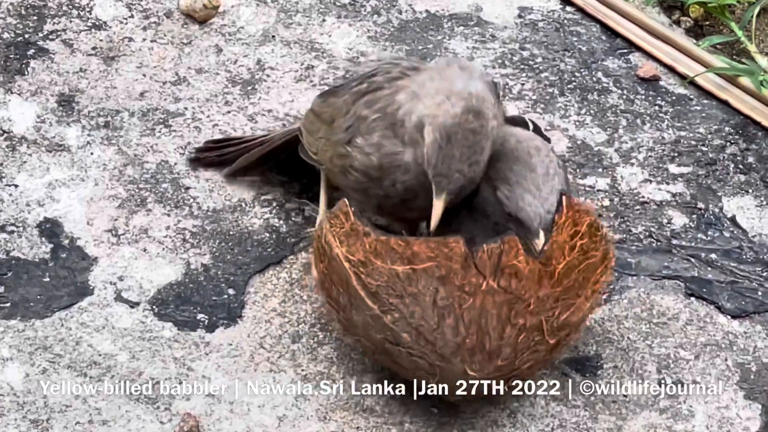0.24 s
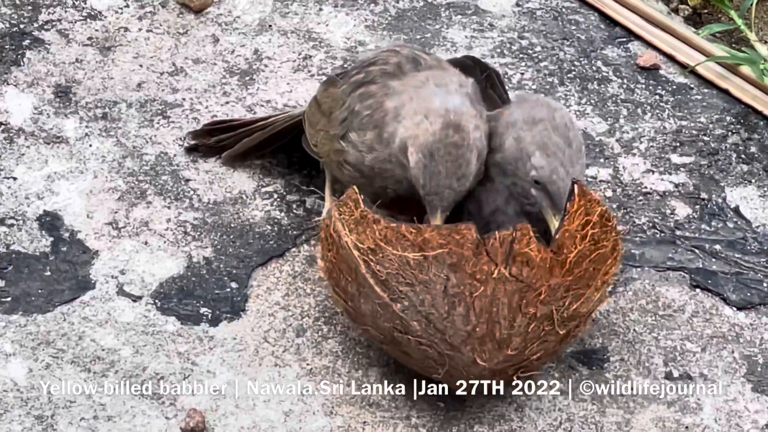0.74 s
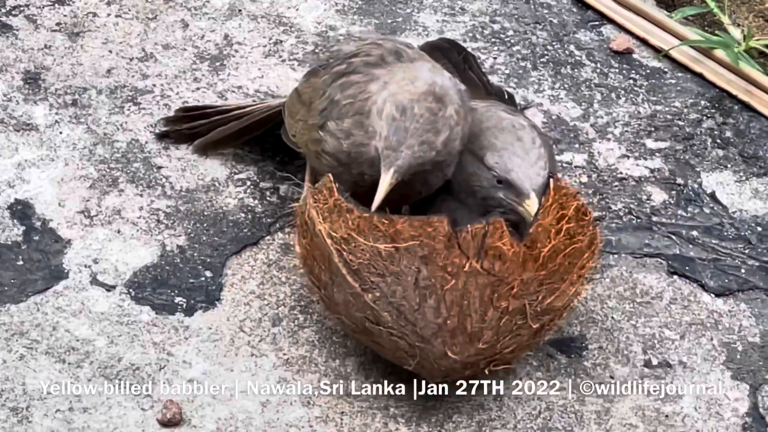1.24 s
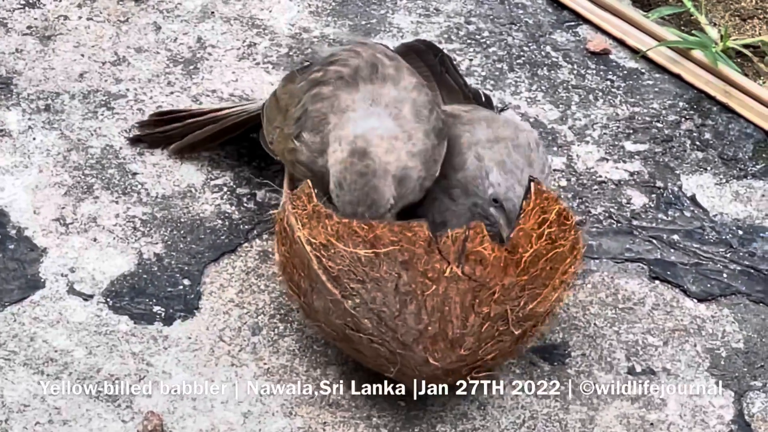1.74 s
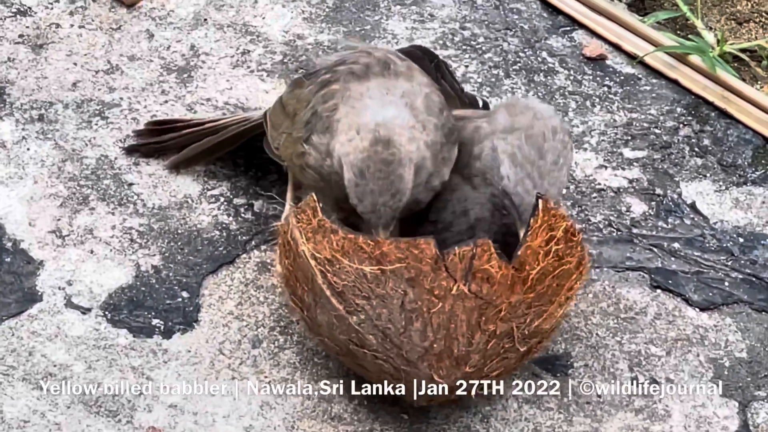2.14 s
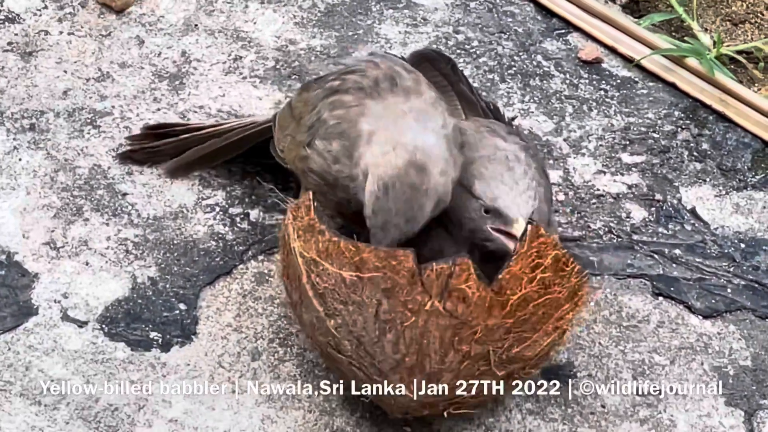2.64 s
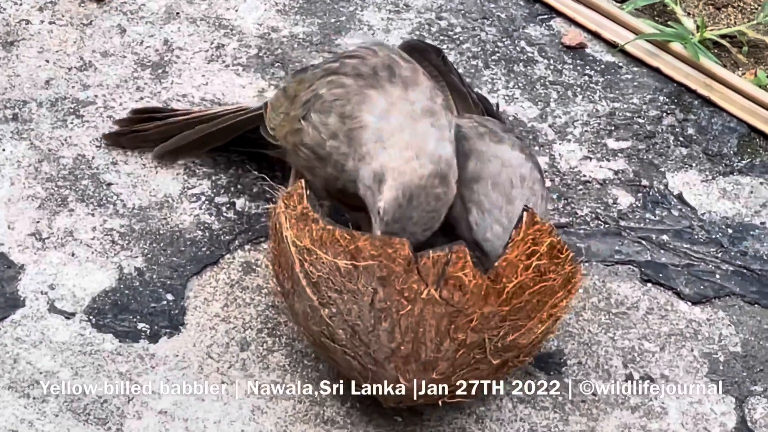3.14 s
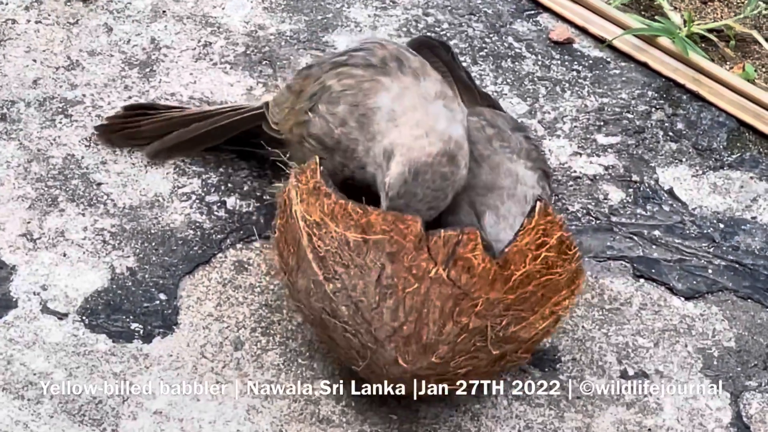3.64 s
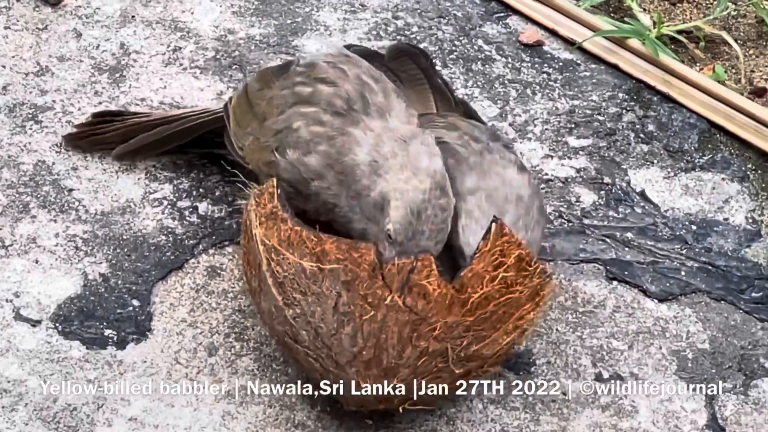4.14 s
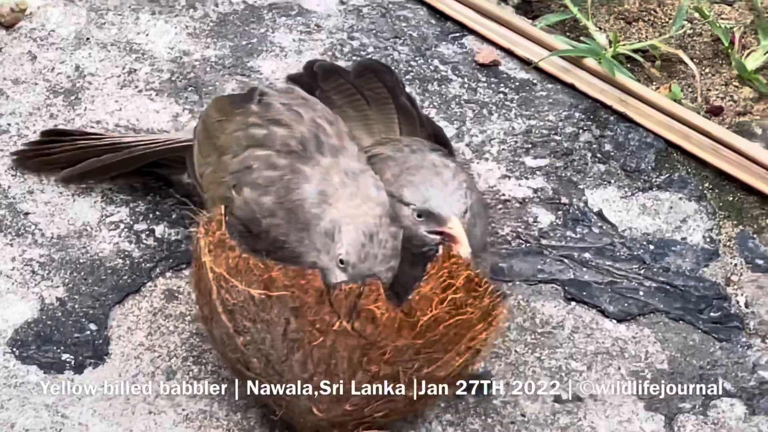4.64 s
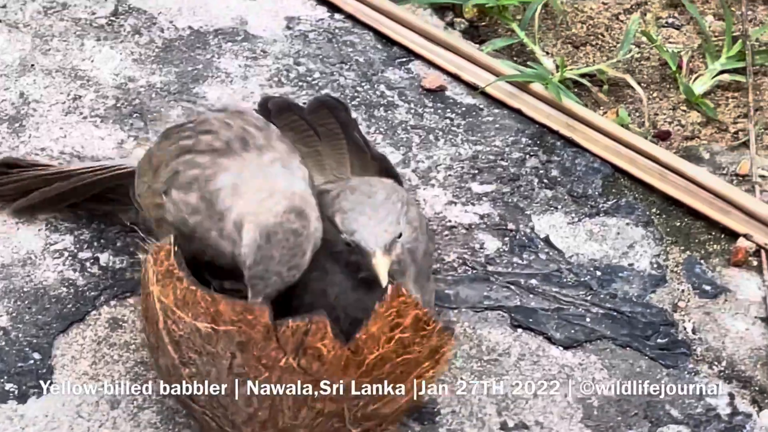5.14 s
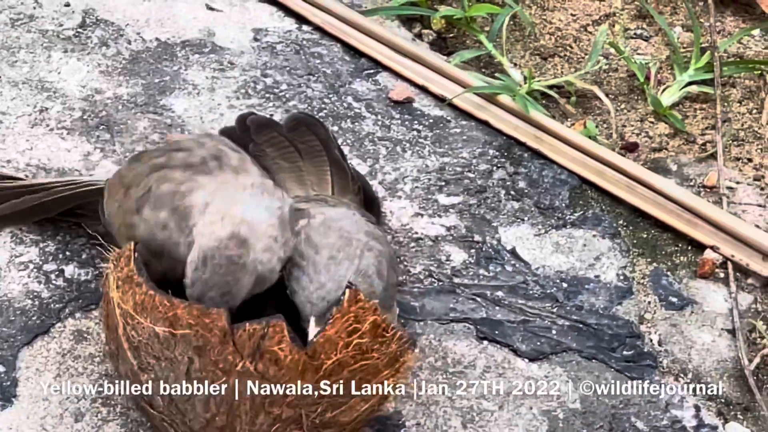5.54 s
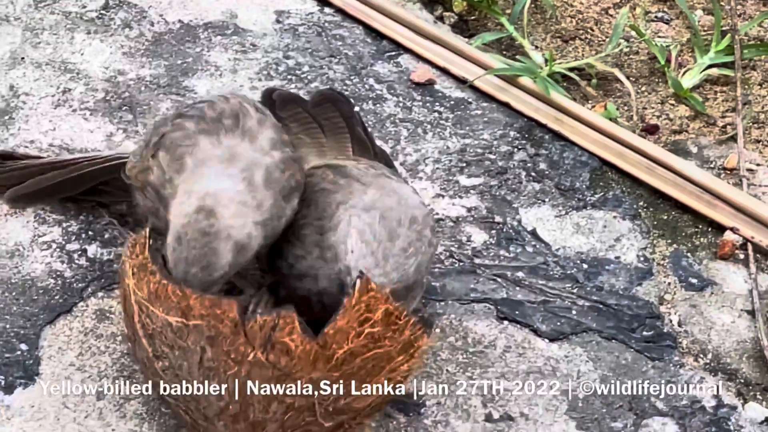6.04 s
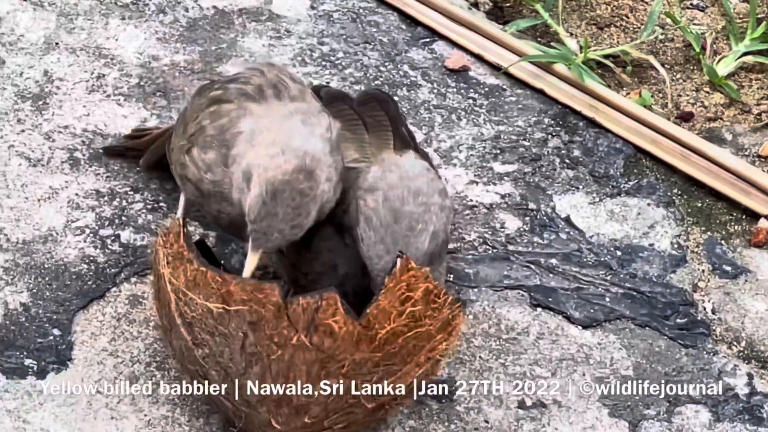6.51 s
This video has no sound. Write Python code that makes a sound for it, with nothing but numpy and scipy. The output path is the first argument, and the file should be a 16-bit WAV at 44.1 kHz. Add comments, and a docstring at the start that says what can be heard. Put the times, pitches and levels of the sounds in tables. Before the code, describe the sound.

Small birds squeak sharply close by and tap a hollow coconut shell, while a crow caws hoarsely three times over a low outdoor hum.

```python
"""A garden path between walls: two babblers feed close by from a coconut shell, squeaking and tapping it.
A crow caws three times from farther off, echoing; more of the flock wheeze and rasp faintly, farther off.
The squeaks are two-voiced tones, the caws rattling harmonics, the far calls gliding tones with jittered pitch.
Taps ring the modes of the shell and ticks are short noise bursts; under it lie a town hum and insect hiss."""
import sys
import numpy as np
from scipy import signal
from scipy.fft import rfft, irfft, next_fast_len
from scipy.io import wavfile
from scipy.ndimage import uniform_filter1d

SR = 44100
rng = np.random.default_rng(int(sys.argv[2]) if len(sys.argv) > 2 else 0)


def transcribe(signal):
    """Save signal, clipped to [-1, 1], as a 16-bit WAV file at the path in sys.argv[1]."""
    frames = np.atleast_2d(signal).T
    limited = np.clip(frames, -1, 1)
    pcm = np.round(limited * 32767).astype(np.int16)
    wavfile.write(sys.argv[1], SR, pcm)


N = 298557
TIME = np.arange(N) / SR  # s

# town rumble: [f/Hz, relative level/dB]
RUMBLE = [(15, -18), (25, -7), (40, -5), (70, 1), (95, -6), (150, -7), (210, -12), (300, -16.5),
          (490, -20.5), (680, -26), (950, -25.5), (1800, -86)]
# far air and insects: [f/Hz, relative level/dB]
AIR = [(500, 3.5), (900, 0), (1300, 0.5), (2200, -2.5), (3200, -10.5), (4500, -19.5), (5700, -18),
       (6600, 5), (7400, -16.5), (9200, -3.5), (10300, -32.5), (11500, -16), (12500, -28), (13500, -51)]
# slow swell of the far air and insects: [t/s, level/dB]
AIR_SWELL = [(0, -67.5), (1.9, -64), (2.25, -67.5), (2.7, -63.5), (4.3, -67.5), (5.5, -68), (6.1, -63),
             (6.7, -69)]
# left-right likeness of the background: [f/Hz, likeness 0-1]
LIKENESS = [(30, .94), (80, .92), (160, .86), (330, .72), (700, .5), (1300, .45), (2500, .85), (5000, .96),
            (12000, .8)]
# squeaks from the upper side of the syrinx: [start t/s, length t/s, first f/Hz, middle f/Hz, last f/Hz,
# level/dB, swell over the note/dB, relative octave level/dB, relative period-doubling level/dB]
UPPER_NOTES = [(0, 0.012, 4890, 4160, 3570, -38.5, -10, -11, -17),
               (.091, 0.1, 4240, 3867, 3325, -39.5, 6, -13.5, -32),
               (.178, 0.063, 3324, 3697, 3930, -39.5, -5, -12.5, -32),
               (2.68, 0.078, 3950, 3980, 4013, -49.5, 1, -16, -21),
               (2.748, 0.066, 4010, 4225, 4373, -42.5, 6, -20.5, -9.5),
               (2.805, .085, 4186, 4273, 4060, -42, -1, -3, -21.5),
               (2.887, .063, 4920, 4450, 4080, -50.5, 10, 3, -31),
               (3.026, 0.041, 4060, 3954, 3790, -45, 3, -13, -35),
               (3.053, .057, 3710, 3827, 4197, -43, 7, -22, -35),
               (3.13, .033, 3940, 3520, 3340, -42.5, -6, -17, -20),
               (4.818, 0.13, 4120, 4098, 4190, -43, 16, -10.5, -45),
               (4.93, 0.083, 4045, 4200, 4500, -33, 3.5, -11, -52),
               (5.002, .021, 4430, 4220, 3750, -39.5, -14, -8.5, -45),
               (5.102, 0.1245, 4370, 3930, 3803, -36, 13, -13.5, -33)]
# squeaks from its lower side: [same columns and units]
LOWER_NOTES = [(.197, 0.039, 2568, 2490, 2480, -44.5, -2, -27, -28),
               (3.032, 0.062, 2415, 2380, 2550, -43.5, 0, -18, -37),
               (3.083, .053, 2484, 2577, 2593, -35, 12, -18.5, -46),
               (5.219, .05, 2710, 2585, 2600, -31.5, -4.5, -15.5, -42)]
# tones made where both voices sound at once: [multiple of upper pitch, multiple of lower pitch]
COMBINATIONS = [(1, -1), (-1, 2), (1, 1), (1, 2), (2, 1), (1, 3)]
# their strengths against the weaker voice: [relative level/dB]
COMBINATION_DB = [-22.5, -32.5, -18.5, -5.5, -25, -26.5]
# colour of the babblers' breath and fizz: [f/Hz, relative level/dB]
FIZZ_COLOUR = [(900, -29.0), (2200, 11.5), (5000, -2), (8500, 7.5), (10300, -9.5), (11500, -10.5), (14000, -14)]
# thin far calls, whines of the flock and one low, faint tone from something distant:
# [start t/s, length t/s, first f/Hz, last f/Hz, level/dB, relative octave level/dB]
FAR_CALLS = [(0, 0.027, 4840, 4440, -52.5, -3.5), (0.26, 0.37, 964, 927, -69, -13),
             (.457, 0.067, 4830, 4620, -70.5, -19), (1.06, .33, 3070, 2950, -67.5, -19),
             (1.156, 0.33, 3457, 3944, -68, -5), (1.444, .16, 3710, 3610, -61.5, -22),
             (2.449, 0.3, 3500, 3975, -64.5, -5.5), (3.504, 0.12, 3393, 3270, -63, -25),
             (3.846, 0.06, 2540, 2522, -60, -40), (4.26, .28, 3624, 4026, -63, -8),
             (4.352, 0.05, 2050, 2035, -60, -10), (4.544, 0.11, 3825, 3465, -58.5, -12),
             (4.662, .073, 2124, 2060, -65, -9), (4.668, 0.12, 3554, 3360, -59, -17),
             (5.96, 0.24, 4190, 3575, -65.5, -4)]
# rasps of the flock: [start t/s, length t/s, first f/Hz, last f/Hz, level/dB, pitch jitter as a share]
RASPS = [(0.119, 0.048, 2590, 2415, -58, 0.15), (0.314, 0.044, 2673, 2714, -59, 0.12),
         (0.465, 0.042, 2470, 2340, -67, 0.093), (1.15, 0.31, 3017, 2885, -66.5, 0.053),
         (1.877, 0.048, 2750, 2660, -61.5, .13), (2.399, 0.19, 1650, 1517, -66.5, .15),
         (2.679, 0.49, 1986, 2385, -65.5, 0.13), (2.68, 0.34, 3670, 3370, -64, 0.024),
         (3.436, 0.14, 2544, 2890, -64, 0.11), (3.505, .11, 2937, 2823, -60.5, 0.125),
         (3.903, .19, 2920, 2964, -60, 0.0433), (3.915, 0.167, 2547, 2580, -68, 0.058),
         (4.259, 0.099, 2690, 2257, -59, 0.05), (4.594, 0.13, 2734, 2205, -59, 0.051)]
# three caws: [start t/s, length t/s, pitch f/Hz, rattle f/Hz, level/dB, relative level of partials above
# the third/dB, their rise as the beak opens/dB, hiss level/dB, left over right/dB]
CAWS = [(.724, 0.28, 473.5, 86.54, -35.5, -4, 11.5, -55, 3.5),
        (1.4, 0.27, 474, 97.9, -35, -12, -5, -56, 5.5), (5.606, .285, 471.5, 98.4, -38, -3, 11, -56, 2)]
# pitch arch of a caw: [share of its length, pitch ratio]
CAW_ARCH = [(0, .9), (.12, .965), (.25, .995), (.45, 1.003), (.72, .998), (.85, .99), (1, .92)]
# resonances of the crow's throat: [f/Hz, relative level/dB]
THROAT = [(500, -55), (750, -13.5), (930, -23.5), (1150, -3.5), (1310, -2.5), (1420, -1.5), (1520, -2.5),
          (1650, 1), (1880, -1), (2000, 2), (2250, -11.5), (2600, -40), (3200, -60)]
# hiss of the caws: [f/Hz, relative level/dB]
CAW_HISS = [(1800, -25), (2500, 2), (3200, -8), (3800, -0.5), (5000, -0.5), (6300, 1), (8400, -2.5),
            (9400, -9), (10300, -30), (11400, -0.5), (12100, -23), (12700, -48)]
# off the walls, the caws arrive out of step: [f/Hz, lead of the left/rad]
CAW_LEAD = [(500, .3), (1030, 1), (1460, 0.9), (1950, -1.55), (2250, -0.2), (2700, .4)]
# bill on the shell: [start t/s, level/dB, ring of the modes above 1 kHz/dB]
PECKS = [(0.939, -40.5, -13), (1.965, -51.5, -1), (2.224, -42, 9), (2.449, -42, -5), (2.494, -52.5, -9),
         (3.427, -43, 10), (4.077, -43.5, 3), (4.377, -39.5, 6.5), (5.945, -41, 10.5), (6.572, -46, 5),
         (6.73, -50, 0)]
# modes of the coconut shell: [f/Hz, relative level/dB, 60 dB decay t/s]
SHELL = [(670, 1, 0.032), (788, 7.5, 0.02), (901, 5.5, 0.021), (1094, -3, 0.023), (1310, 0, 0.011),
         (1615, -9.5, 0.03), (2420, -37, 0.022), (3280, -14.5, 0.022)]
# colour of the bill's scrape: [f/Hz, relative level/dB]
SCRAPE_COLOUR = [(400, 0.0), (800, 5), (1400, -20), (2200, -19), (6000, -31), (12000, -49)]
# bill snaps and claw ticks: [start t/s, level before the common gain of ticks()/dB]
TICKS = [(1.3271, -57), (1.9854, -56), (2.227, -49), (2.255, -45), (2.2694, -42.5), (2.553, -38.5),
         (2.5654, -43), (4.378, -52.5), (5.2412, -35.5), (6.0863, -41.5), (6.095, -46.5), (6.1806, -47),
         (6.2337, -50.5)]
# colour of a tick: [f/Hz, relative level/dB]
TICK_COLOUR = [(1200, -14.5), (3000, -1.5), (6000, -5.5), (9000, -4.5), (11500, -3), (13000, -22),
               (15500, -22)]

RUMBLE_DB, HUM_HZ, HUM_DB = -52.5, 76, -59.5
# every squeak bulges in the middle; its pitch sags (as a share) when pressure is low
NOTE_ATTACK_S, NOTE_RELEASE_S, NOTE_BULGE_DB, NOTE_SAG = .006, .012, 4, .085
# every caw swells in, grows a little and fades; its pitch wanders (as a share)
CAW_ATTACK_S, CAW_RELEASE_S, CAW_SWELL_DB, CAW_WANDER = 0.072, 0.058, 0.5, 0.0094
FAR_CALL_JITTER = 0.0162  # share of the pitch
CUTOFF_HZ = 15700


def from_db(db):
    """Decibels to gain."""
    return 10 ** (np.asarray(db) / 20)


def rms_one(x):
    """Scale to rms 1."""
    return x / np.sqrt(np.mean(x ** 2) + 1e-20)


def at_hz(points, hz):
    """Read a table on a log-frequency axis."""
    f, value = np.transpose(points)
    return np.interp(np.log(hz + 1e-3), np.log(f), value)


def bins(count):
    """Frequencies of the spectrum of count samples."""
    return np.fft.rfftfreq(count, 1 / SR)


def colour(x, spectrum):
    """Pass a sound through a smooth resonance curve; rms 1."""
    count = x.shape[-1]
    size = next_fast_len(count)
    gain = from_db(at_hz(spectrum, bins(size)))
    return rms_one(irfft(rfft(x, size) * gain, size)[..., :count])


def drift(rate, count):
    """Smooth random wander with spread about 1, from rate random points per second."""
    knots = rng.standard_normal(int(count / SR * rate) + 3)
    return np.interp(np.arange(count) / SR * rate, np.arange(len(knots)), knots) / np.sqrt(2 / 3)


def pan(db):
    """Left and right gains for a level difference."""
    gains = from_db(np.array([[db], [-db]]) / 2)
    return gains / gains.mean()


def add(out, start, sound):
    """Mix a sound in at its start time."""
    i = max(0, int(start * SR))
    out[..., i:i + sound.shape[-1]] += sound[..., :N - i]


def stereo(mid, side, alike):
    """Blend independent noises into a left-right pair of the given likeness."""
    alike = np.clip(alike, 0, 1)
    return np.sqrt(1 + alike) * mid + np.sqrt(1 - alike) * side * [[1], [-1]]


def garden(x, t60, wet_db, alike, delay=0.0022):
    """Scattered echoes from walls and leaves, decaying noise that differs between left and right."""
    t = np.arange(SR) / SR
    # silent for the delay, then full after as long again
    onset = np.clip(t / delay - 1, 0, 1)
    mid, side = rng.standard_normal((2, SR)) * from_db(-60 * t / t60) * onset
    echoes = rms_one(stereo(mid, side, alike)) / np.sqrt(SR)
    return x + from_db(wet_db) * signal.fftconvolve(np.atleast_2d(x), echoes, axes=1)[:, :N]


def delay_right(pair, phase_lag):
    """Hold the right channel back by a phase in radians at each frequency."""
    size = next_fast_len(N + 64)
    right = irfft(rfft(pair[1], size) * np.exp(-1j * phase_lag(bins(size))), size)[:N]
    return np.array([pair[0], right])


def from_the_left(pair, lag=1.0):
    """Sound from a little to the left arrives lag samples later at right; the phase shift levels off in the treble."""
    return delay_right(pair, lambda hz: np.minimum(2 * np.pi * hz * lag / SR, .8))


def out_of_step(pair, lead):
    """Scattered sound: the right's phase trails the left's by a table of (Hz, radians)."""
    return delay_right(pair, lambda hz: at_hz(lead, hz))


def pressure(t, length, attack, release):
    """Air pressure of one call, 0-1: attack, hold, release."""
    return np.clip(np.minimum(t / attack, (length - t) / release), 0, 1)


def ambience(spectrum):
    """Steady stereo noise, wide in the middle range; rms 1."""
    size = next_fast_len(N)
    mid, side = rfft(rng.standard_normal((2, size)))
    pair = stereo(mid, side, at_hz(LIKENESS, bins(size)))
    return rms_one(irfft(pair * from_db(at_hz(spectrum, bins(size))), size)[:, :N])


def background():
    """Town rumble with a wavering engine hum, and the hiss of air and insects."""
    phase = 2 * np.pi * np.cumsum(HUM_HZ * (1 + 0.0308 * drift(12, N))) / SR
    hum = np.sqrt(2) * np.sin(phase) * from_db(HUM_DB + 2 * drift(5.2, N))
    air = from_db(np.interp(TIME, *np.transpose(AIR_SWELL))) * ambience(AIR)
    return hum + from_db(RUMBLE_DB) * ambience(RUMBLE) + air


def phrase(rows):
    """Each note bends along one arc, overlapping notes are slurred; gives pitch, level, octave and half-pitch shares."""
    total = np.zeros((5, N))
    for start, length, first_hz, middle_hz, last_hz, level_db, swell_db, octave_db, half_db in rows:
        t = np.arange(int(length * SR)) / SR
        along = 2 * t / length - 1  # -1 to 1
        arc = np.polyfit([-1, 0, 1], [first_hz, middle_hz, last_hz], 2)
        hz = np.polyval(arc, along)
        level = from_db(level_db + swell_db * along / 2 - NOTE_BULGE_DB * along ** 2)
        push = pressure(t, length, NOTE_ATTACK_S, NOTE_RELEASE_S)
        values = (1, hz, level, from_db(octave_db), from_db(half_db))
        add(total, start, np.array([push * value for value in values]))
    # average overlapping notes, weighted by pressure
    hz, level, octave, half = total[1:] / (total[0] + 1e-9)
    push = np.minimum(total[0], 1)
    return hz * (1 - NOTE_SAG * (1 - push)), level * push, octave, half


def squeaks(rows, jitter, third_db, flutter_db):
    """One side of the syrinx: a near sine, overtones, a trace of period doubling; gives sound, phase, level."""
    hz, level, octave, half = phrase(rows)
    phase = 2 * np.pi * np.cumsum(hz * (1 + jitter * drift(500, N))) / SR
    overtones = np.sin(2 * phase) + from_db(third_db) * np.sin(3 * phase)
    doubling = np.sin(phase / 2) + .35 * np.sin(3 * phase / 2)
    tone = np.sin(phase) + octave * from_db(2 * drift(120, N)) * overtones
    tone += half * from_db(2 * drift(40, N)) * doubling
    level = np.sqrt(2) * level * from_db(flutter_db * drift(150, N))
    return tone * level, phase, level


def babblers(breathy_db=-40, clash_db=-13):
    """Where the two voices overlap they modulate each other into combination tones and a harsh fizz."""
    upper, upper_phase, upper_level = squeaks(UPPER_NOTES, jitter=0.0045, third_db=-25.5, flutter_db=0.74)
    lower, lower_phase, lower_level = squeaks(LOWER_NOTES, jitter=0.0068, third_db=-6.5, flutter_db=2.5)
    overlap = np.minimum(upper_level, lower_level)
    mixed = sum(from_db(db) * np.sin(m * upper_phase + n * lower_phase)
                for (m, n), db in zip(COMBINATIONS, COMBINATION_DB))
    fizz = colour(rng.standard_normal(N), FIZZ_COLOUR)
    fizz_level = from_db(breathy_db) * (upper_level + lower_level) + from_db(clash_db) * overlap
    voices = upper + lower + overlap * mixed + fizz_level * fizz
    return garden(voices, t60=0.42, wet_db=-13.0, alike=0.92)


def glide(length, first_hz, last_hz, jitter, jitter_hz, flutter_db, octave_db, third_db):
    """One gliding call; fast pitch jitter turns a thin tone into a rasp."""
    count = int(length * SR)
    pitch = np.linspace(first_hz, last_hz, count) * (1 + jitter * drift(jitter_hz, count))
    phase = 2 * np.pi * np.cumsum(pitch) / SR
    tone = np.sin(phase) + from_db(octave_db) * np.sin(2 * phase) + from_db(third_db) * np.sin(3 * phase)
    return tone * signal.windows.tukey(count, .25) * from_db(flutter_db * drift(250, count))


def far_calls():
    """Faint gliding tones wrapped in echoes: thin far calls, one of them low, and the flock's rasps."""
    out = np.zeros(N)
    for start, length, first_hz, last_hz, level_db, octave_db in FAR_CALLS:
        call = glide(length, first_hz, last_hz, FAR_CALL_JITTER, jitter_hz=700.4, flutter_db=2.0,
                     octave_db=octave_db, third_db=-47)
        add(out, start, from_db(level_db) * call)
    for start, length, first_hz, last_hz, level_db, jitter in RASPS:
        rasp = glide(length, first_hz, last_hz, jitter, jitter_hz=1321, flutter_db=4.0,
                     octave_db=-26, third_db=-17)
        add(out, start, from_db(level_db) * rasp)
    return garden(out, t60=0.63, wet_db=-0.5, alike=0.8)


def crow(rattle_swing=0.25, noise_db=-13, edge_noise_db=12, hiss_flutter_db=-0.2):
    """A harmonic voice, shaken in pitch (swing in radians) and strength by a fast rattle, rings in the throat."""
    voice, hiss = np.zeros((2, N)), np.zeros(N)
    for start, length, hz, rattle_hz, level_db, upper_db, opening_db, hiss_db, pan_db in CAWS:
        count = int(length * SR)
        along = np.linspace(0, 1, count)
        bend = np.interp(along, *np.transpose(CAW_ARCH)) * (1 + CAW_WANDER * drift(34.42, count))
        turn = 2 * np.pi * np.cumsum(rattle_hz * bend * (1 + 0.096 * drift(145.6, count))) / SR
        phase = 2 * np.pi * np.cumsum(hz * bend * (1 + .005 * drift(500, count))) / SR
        phase += rattle_swing * np.sin(turn)
        rattle = rms_one(np.exp(.32 * np.cos(turn + 1.1) + .2 * drift(250, count)))
        # the opening beak changes the balance of the partials above the third
        beak_db = upper_db + opening_db * (along - .5)
        buzz = sum(np.cos(k * phase) * from_db(beak_db * (k > 3)) for k in range(1, 8))
        # the voice is hoarsest as it starts and breaks off
        rough_db = noise_db + edge_noise_db * (2 * along - 1) ** 2
        rough = colour(rng.standard_normal(count) * rattle, THROAT) * from_db(rough_db)
        caw = colour(buzz * rattle, THROAT) + rough
        # level the caw before the effort shapes it
        caw /= np.sqrt(uniform_filter1d(caw ** 2, size=1500))
        effort = pressure(along * length, length, CAW_ATTACK_S, CAW_RELEASE_S)
        effort = effort * from_db(CAW_SWELL_DB * (along - 1.0))
        add(voice, start, caw * effort * from_db(level_db) * pan(pan_db))
        breath = colour(rng.standard_normal(count) * rattle, CAW_HISS)
        add(hiss, start, breath * effort * from_db(hiss_db + hiss_flutter_db * drift(29, count)))
    # near walls scatter the caw at once, far ones answer for longer
    near = garden(voice, t60=.13, wet_db=-7, alike=0, delay=.002)
    wide = garden(near, t60=.55, wet_db=-5, alike=0, delay=.008)
    hiss = garden(hiss, t60=0.54, wet_db=1.0, alike=0.97)
    return out_of_step(wide, CAW_LEAD) + from_the_left(hiss, lag=0.55)


def pecks(scrape_db=-9):
    """Each tap of a bill rings the shell's modes with strengths of their own, over a short scrape."""
    out, t = np.zeros(N), np.arange(SR // 8) / SR
    for start, level_db, upper_db in PECKS:
        knock = np.zeros(len(t))
        for k, (hz, db, t60) in enumerate(SHELL):
            strength = from_db(db + upper_db * (hz > 1000) + rng.normal(0, 0.43))
            mode_hz = hz * (1 + rng.normal(0, 0.035))
            # neighbouring modes start in opposite directions
            knock += strength * from_db(-60 * t / t60) * np.sin(2 * np.pi * mode_hz * t) * (-1) ** k
        scrape = colour(rng.standard_normal(len(t)), SCRAPE_COLOUR) * from_db(-60 * t / 0.067)
        tap = knock / np.abs(knock).max() + from_db(scrape_db) * scrape
        add(out, start, tap * from_db(level_db) * np.minimum(t / 0.0011, 1))
    return garden(out, t60=0.34, wet_db=-7, alike=0.19)


def ticks(t60=0.017, gain_db=-7):
    """Dry snaps of bills and claws on the husk: coloured noise dying by 60 dB in t60 seconds."""
    out, t = np.zeros(N), np.arange(SR // 16) / SR
    for start, level_db in TICKS:
        snap = colour(rng.standard_normal(len(t)), TICK_COLOUR)
        add(out, start, snap * from_db(level_db + gain_db - 60 * t / t60))
    return garden(out, t60=0.22, wet_db=-8.0, alike=0.65)


def scene():
    """All the calls and taps over the background; babblers, far calls and ticks lie a little to the left."""
    return background() + from_the_left(babblers() + far_calls() + ticks()) + crow() + pecks()


def record(dry):
    """The microphone signal's top is cut steeply by a low-pass filter."""
    return signal.sosfilt(signal.cheby2(12, 70, CUTOFF_HZ, fs=SR, output="sos"), dry)


dry = scene()
out = record(dry)
transcribe(out)
```